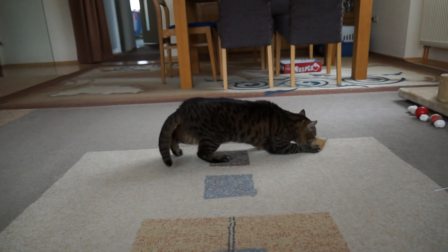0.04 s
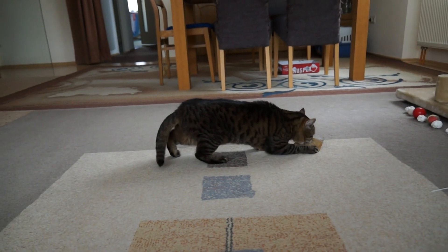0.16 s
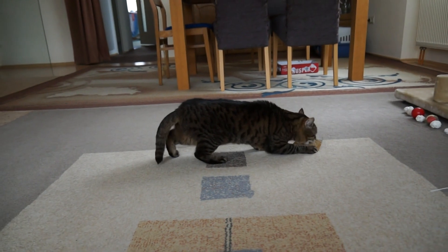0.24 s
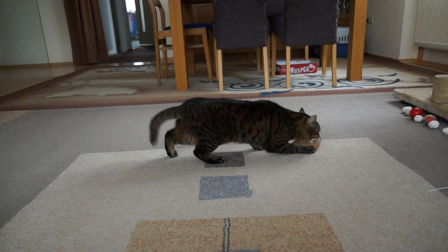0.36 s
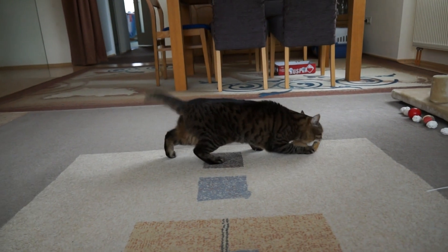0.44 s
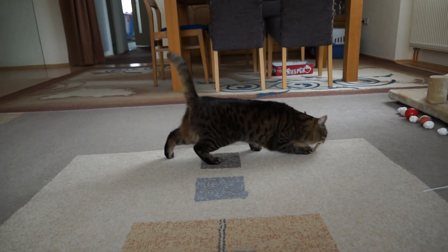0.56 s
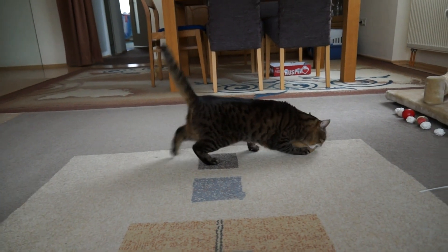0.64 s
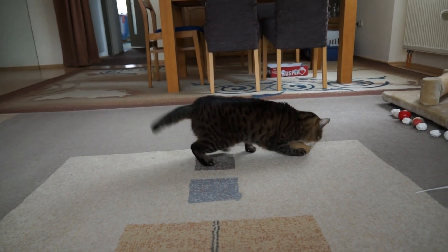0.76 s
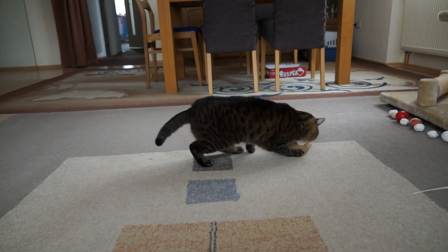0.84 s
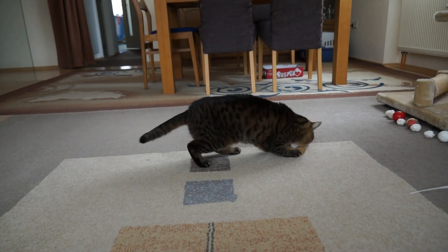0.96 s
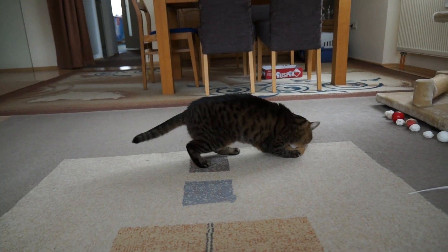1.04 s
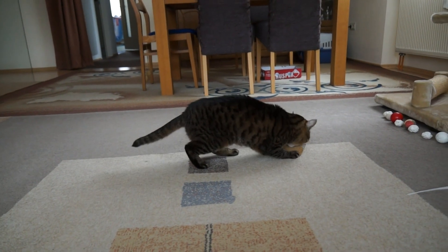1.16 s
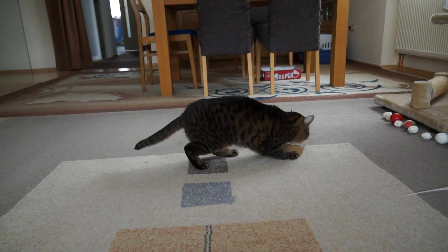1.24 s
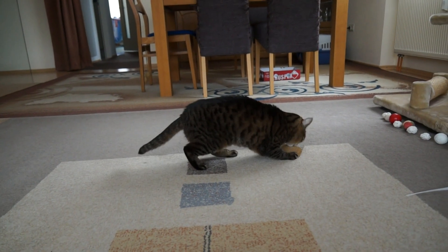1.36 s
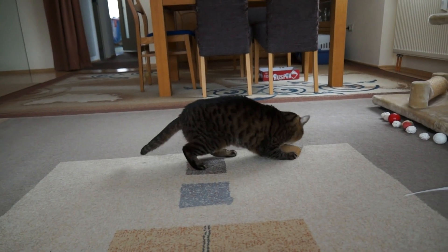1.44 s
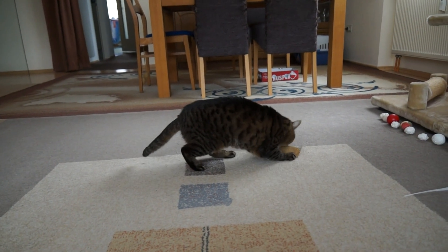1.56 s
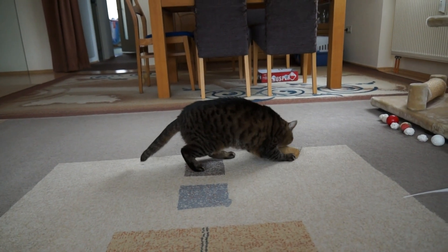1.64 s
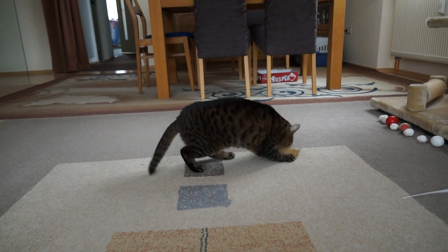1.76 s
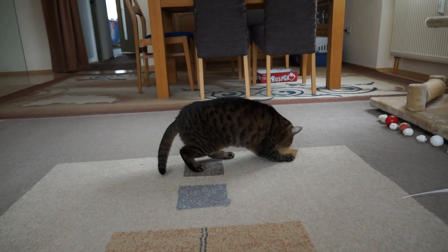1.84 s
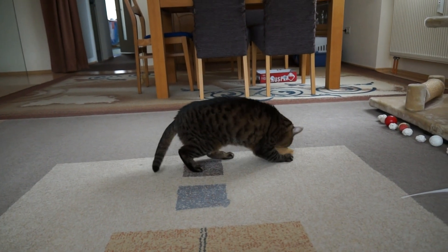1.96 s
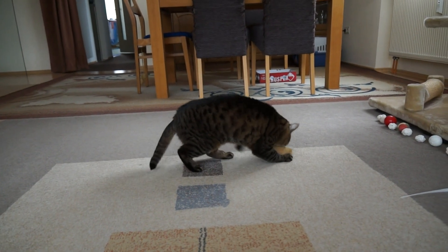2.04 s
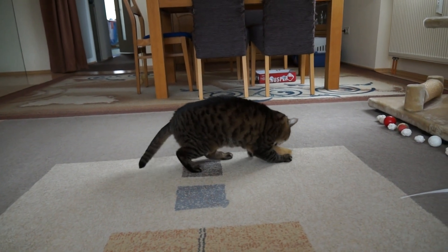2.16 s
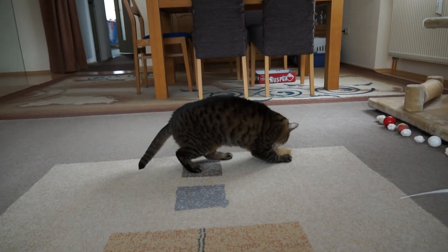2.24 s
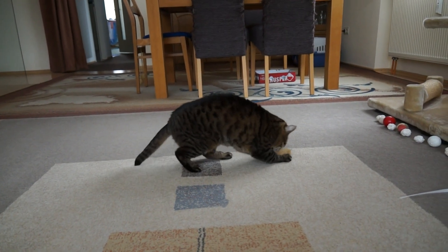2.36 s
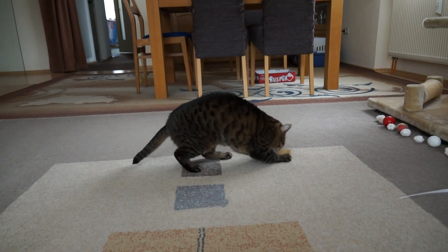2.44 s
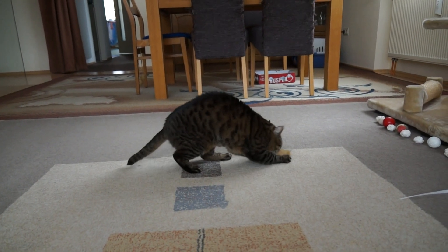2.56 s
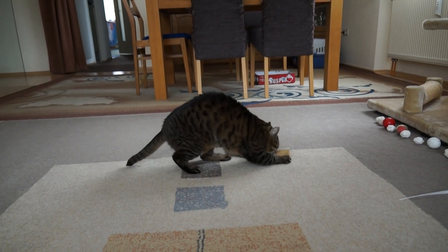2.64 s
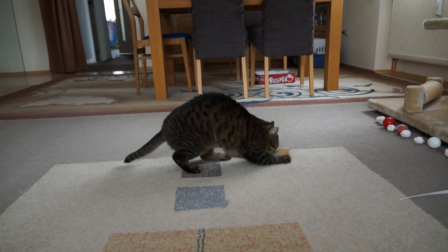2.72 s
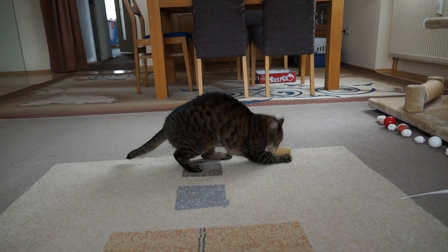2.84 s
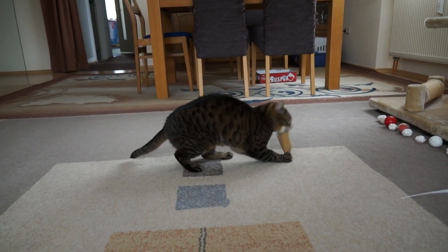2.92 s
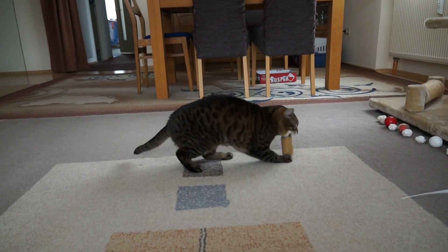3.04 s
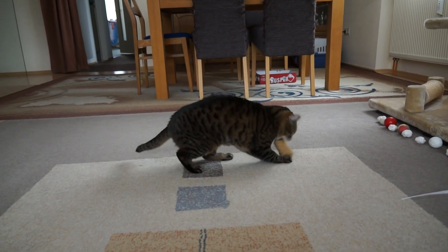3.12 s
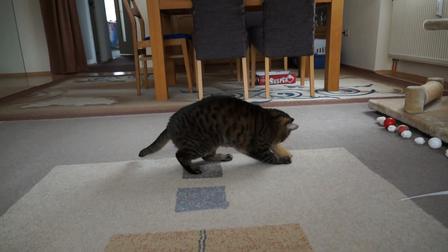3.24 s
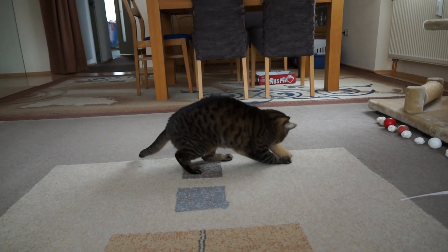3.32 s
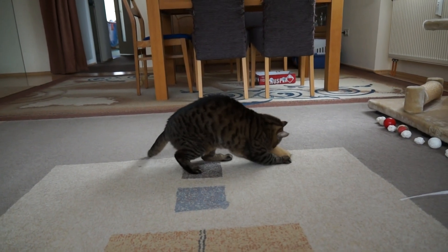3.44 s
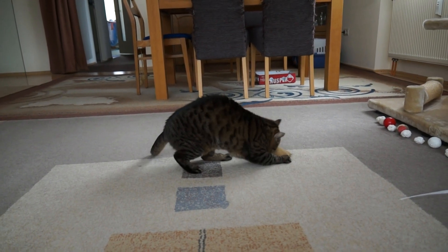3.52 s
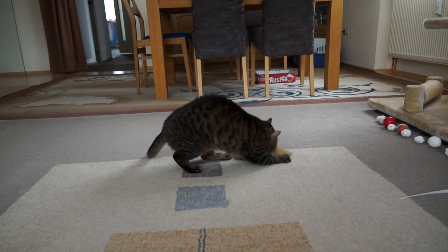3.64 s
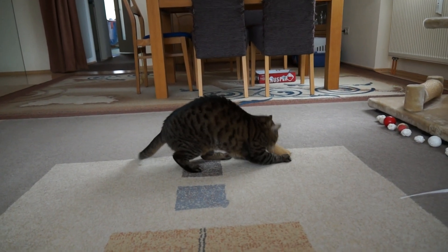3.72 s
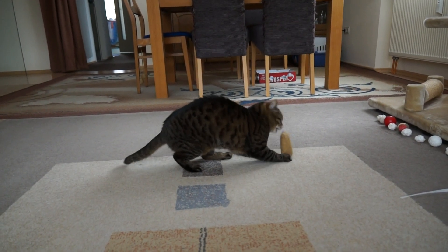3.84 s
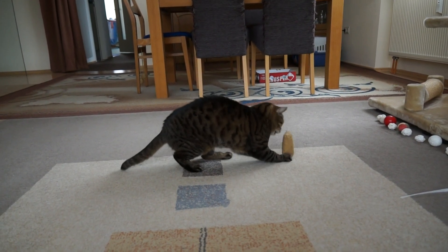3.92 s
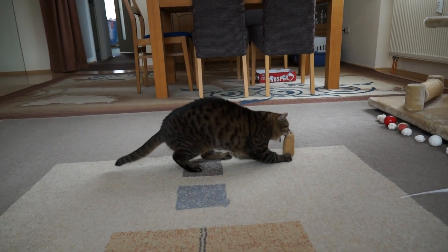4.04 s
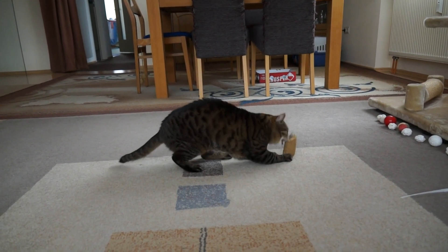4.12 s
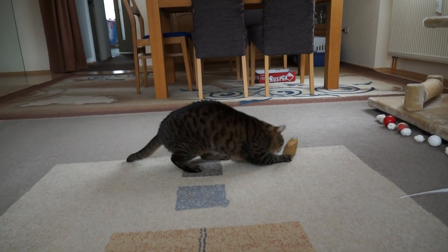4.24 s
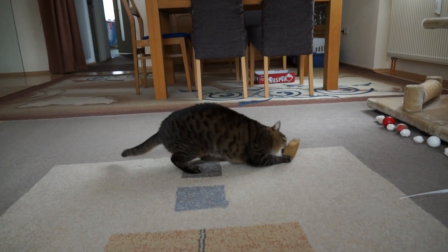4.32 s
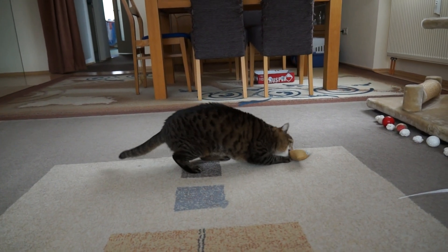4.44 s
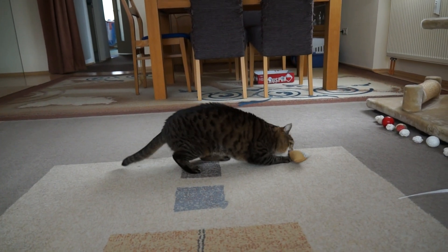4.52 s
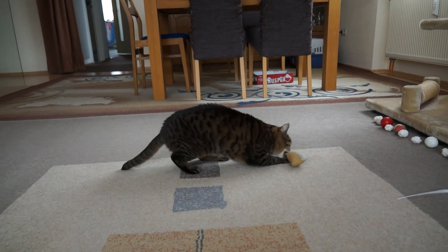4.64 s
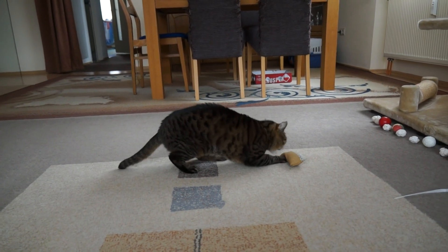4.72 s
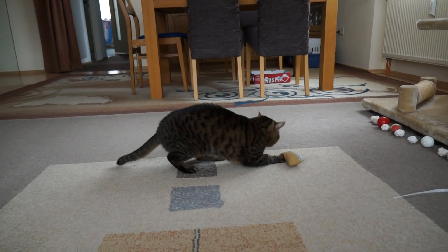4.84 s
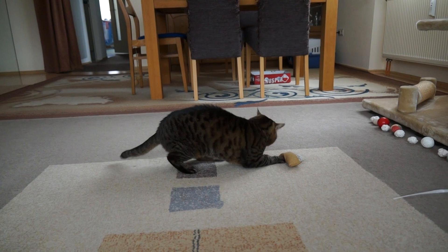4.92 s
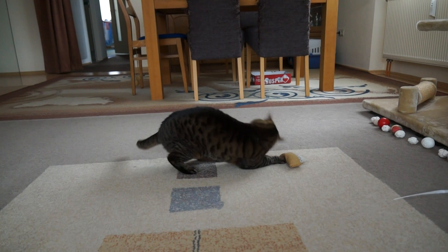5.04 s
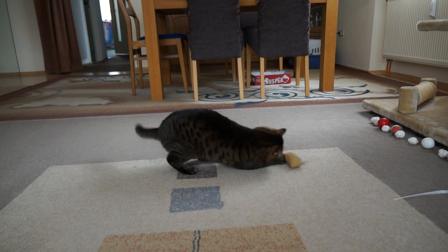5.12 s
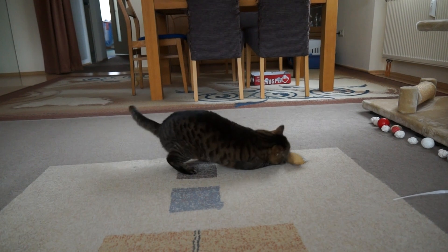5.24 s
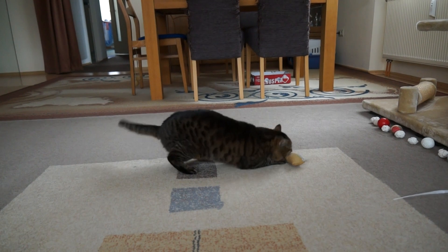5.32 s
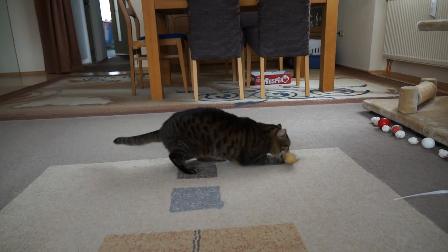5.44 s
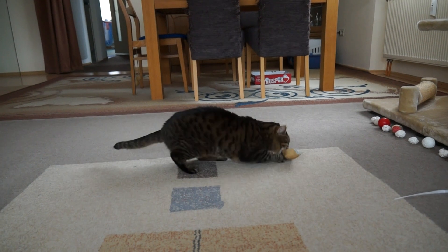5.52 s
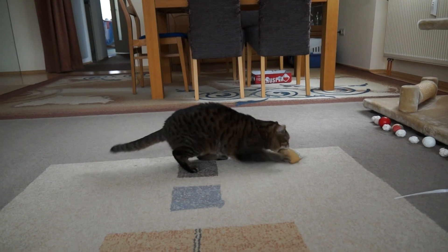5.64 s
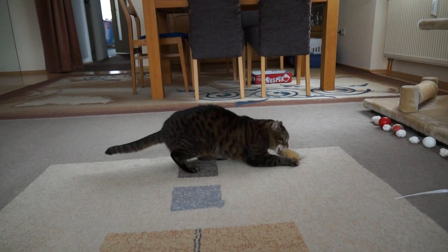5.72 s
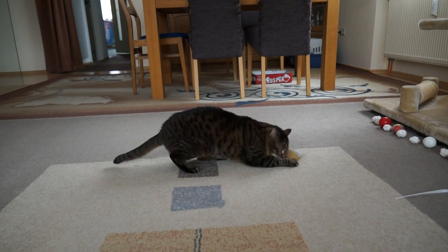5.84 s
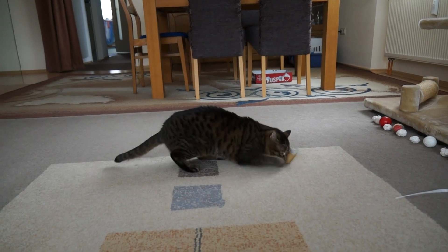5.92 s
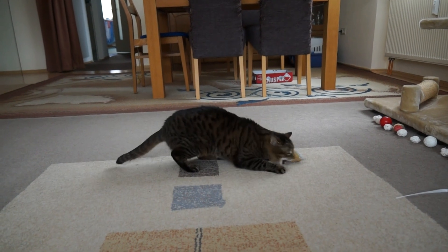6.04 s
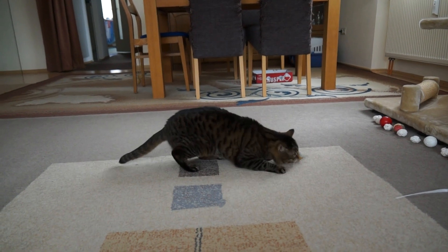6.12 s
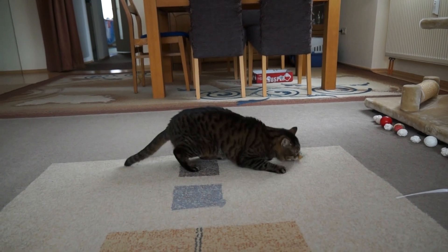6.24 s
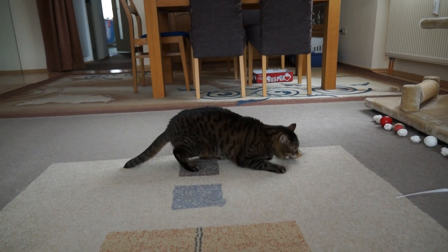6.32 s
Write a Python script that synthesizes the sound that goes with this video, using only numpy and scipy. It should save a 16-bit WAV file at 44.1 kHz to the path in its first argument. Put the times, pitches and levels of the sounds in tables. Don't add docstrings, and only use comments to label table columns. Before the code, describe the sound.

In a carpeted living room, a cat wrestles a small stuffed pillow about two metres from a small stereo microphone with little bass. From 0 s, fur and cloth brush in soft, fizzy strokes while paws drag on the pile. Around 0.6 to 1.3 s, rustling swells with clusters of very bright claw ticks and soft padding. At 1.7 s a snap and short scrape begin a tug; a crisp tick follows at 1.8 s and a harder clack with a cloth jerk at 2 s. Another tug cracks at 3 s, trailing tiny rattly smacks. From 3.2 to 5.4 s, gentler rustles swell and fade with sparse ticks and muted pats. At 5.6 s the strongest blow strikes the floor, sharp and knocking, followed by skidding, a padded tap near 5.95 s and light scuffling to 6.4 s. Dull echoes, faint unsteady motor hum and wide hiss persist.

```python
import sys
import numpy as np
from scipy import signal
from scipy.fft import rfft, irfft
from scipy.io import wavfile
from scipy.ndimage import uniform_filter1d

SR = 44100
rng = np.random.default_rng(int(sys.argv[2]) if len(sys.argv) > 2 else 0)


def volts_from_decibels(level):
    exponent = np.asarray(level, float) / 20
    return 10 ** exponent


def bounce(signal):
    frames = np.transpose(np.atleast_2d(signal))
    limited = np.clip(frames, -1, 1)
    pcm = np.round(limited * 32767).astype(np.int16)
    wavfile.write(sys.argv[1], SR, pcm)


N = 281358

# peak in seconds, peak level in dB, fall in ms, coarse share in dB.
FLICKS = [(0, -54.5, 120, -6.5), (.446, -54, 250, -11.5), (.695, -53, 270, -8.5), (1.2, -48.5, 110, -10.5),
          (1.444, -63, 86, -22), (2.133, -50.5, 56, -9.5), (2.176, -53, 170, -13.5), (2.659, -49, 650, -8),
          (3.425, -55, 190, -11.5), (4.033, -45, 78, -17.5), (4.375, -47.5, 117, -17.5),
          (4.457, -44, 164, -12.5), (4.63, -52.5, 120, -10), (5.257, -52.5, 120, -12.5),
          (5.759, -46, 57, -6.5), (2.556, -52, 94, -14), (6.156, -58, 50, -20), (3.405, -58, 42, -15)]
SWEEPS = [(.133, -56.5, 240, -10), (.221, -50.5, 40, -12), (.626, -47, 98, -6.5), (.909, -47.5, 110, -12),
          (1.086, -47, 190, -15), (1.378, -55.5, 94, -30), (1.604, -50, 41, -8.5), (1.8, -45, 46, -7.5),
          (1.806, -48, 190, -8), (1.998, -34.5, 9.8, -6.5), (2.98, -27.5, 10.4, -9),
          (3.101, -44.5, 80, -23), (3.269, -55, 120, -25), (3.591, -45, 130, -14), (3.86, -44, 31, -16),
          (4.185, -45.5, 105, -16.5), (4.525, -46.5, 104, -13.5), (4.722, -56.5, 115, -7),
          (5.157, -62.5, 67, -3), (5.428, -43.5, 153, -12.5), (5.508, -47.5, 62, -6),
          (5.555, -47.5, 38, -7), (5.639, -43, 90, -5), (5.959, -40, 20, -16), (6.193, -46, 66, -10),
          (6.274, -51.5, 92, -10)]
PULLS = [(.56, -55.5, 14, -17), (1.023, -59, 17, -7), (1.548, -70, 23, 0), (2.009, -46.5, 186, -9),
         (2.369, -46.5, 15, -10), (2.445, -49, 90, -11), (2.986, -39, 79, -15.5), (3.858, -45, 104, -13),
         (5.96, -44.5, 26.7, -14), (6.051, -56, 69, -7.5), (6.362, -52, 25, -21)]
FLICK_RISE_RATIO, SWEEP_RISE_RATIO, PULL_RISE_RATIO = 0.22, 0.73, 2.58

# frequency in Hz, density in dB per Hz.
FIBRE_SPECTRUM = [(1800, -25), (3000, -23), (4000, -13), (6000, -4.5), (8500, -0.5), (10500, 1),
                  (12000, -2), (14900, -12), (16500, -20)]
SNAG_SPECTRUM = [(1200, -39), (2200, -7), (3200, -2), (4500, -3), (7000, -13)]
STUFFING_SPECTRUM = [(120, -17.5), (300, -4.5), (600, -2), (1200, -3.5), (2000, -8), (3200, -20)]
# frequency in Hz, gain in dB.
SPREAD_TILT = [(4000, -3), (8000, 1.5), (12000, 3.5)]

# time in seconds, level in dB.
WEIGHT = [(0, -62), (.25, -64.5), (.49, -63.5), (1.09, -60.5), (1.685, -64), (1.705, -53), (1.84, -60.5),
          (2.18, -64), (2.55, -57), (3.12, -72.5), (3.57, -60.5), (4.02, -69), (4.35, -61), (5.3, -70),
          (5.5, -62), (5.77, -65), (6.0, -62.5), (6.38, -65)]
# peak in seconds, peak level in dB, fall in ms.
DRAGS = [(0, -57.5, 160), (.55, -63.5, 240), (1.094, -62, 370), (1.6, -61, 135), (1.8, -51, 170),
         (1.97, -63, 230), (2.41, -62, 340), (2.9, -56, 280), (3.72, -59, 320), (4.47, -64, 435),
         (5.15, -65.5, 270), (5.45, -55, 250), (5.95, -60.5, 280), (6.25, -61.5, 180)]
SKIDS = [
    (1.703, -54, 90),
    (2.004, -52, 150),
    (2.985, -62, 160),
    (5.592, -47.5, 130),
]
DRAG_RISE_RATIO, SKID_RISE_RATIO = 0.78, 0.056
# frequency in Hz, density in dB per Hz.
PILE_SPECTRUM = [(60, -28), (150, -12.5), (300, 2), (500, -3.5), (800, -5.5), (1100, -11.5), (1800, -19)]
WEAVE_SPECTRUM = [(400, -18.5), (800, -1), (1100, -2), (1600, 0), (2300, -9.5), (4000, -21.5)]

# time in seconds, peak level in dB, centre in Hz.
TICKS = [(0.42, -32, 10400), (0.612, -19, 10650), (0.628, -20, 10200), (0.6933, -26, 9300),
         (0.893, -27, 8600), (1.0106, -28, 10330), (1.0234, -16, 10800), (1.3545, -37, 8450),
         (1.5828, -32, 7960), (1.6023, -32, 9620), (1.8035, -10, 10400), (1.929, -22, 9670),
         (1.996, -14, 7800), (2.5521, -31, 10400), (2.9146, -14, 9400), (3.4283, -27, 10100),
         (4.0251, -25, 9200), (4.363, -25, 10100), (4.3834, -28, 8900), (4.4478, -24, 9430),
         (4.5241, -17.5, 10220), (5.4936, -25, 7080), (5.5114, -26, 5030), (5.5548, -25, 10910),
         (5.7588, -29, 9500), (5.919, -34, 5160), (5.9562, -27, 10500), (6.1753, -35, 10650),
         (6.2536, -23, 9400), (6.2775, -21.5, 9900), (.5397, -34, 11100), (.5566, -32, 10700),
         (.5911, -29, 10600), (1.049, -30, 11500), (1.1533, -23, 9600), (1.2056, -26, 10100),
         (1.116, -21, 11000), (1.134, -23, 11500), (1.256, -34, 11500), (1.311, -34, 9000),
         (1.7764, -24, 10510), (2.1286, -31, 9620), (2.333, -30, 10700), (2.4274, -25, 8880),
         (2.7731, -29, 10100), (2.8015, -27, 10200), (3.0859, -27, 10500), (3.4037, -35, 11000),
         (3.707, -31, 10300), (3.8561, -24, 10400), (4.1465, -33, 10600), (4.1584, -32, 10600),
         (4.6199, -31, 10400), (5.246, -34, 10100), (5.512, -21, 8550), (6.1554, -31, 12800),
         (6.1918, -25, 11800)]
# time in seconds, peak level in dB, centre in Hz, length in cycles.
SNAPS = [(1.5384, -37, 5800, 1.6), (1.6935, -22.5, 7000, 0.75), (1.9, -31, 10500, 2.5),
         (5.5834, -5.5, 8300, 0.89), (5.5836, -21.5, 2540, 1.36), (1.9, -40, 3500, 0.66),
         (1.7044, -33, 3300, 0.92), (1.5812, -40, 1400, 1.2), (1.9958, -42, 3300, 1.9),
         (2.1275, -44, 3460, 3.1), (1.8035, -26.5, 6000, 2), (1.9, -42, 4200, 1.2),
         (2.9776, -17, 9380, 0.7), (2.9772, -26, 3800, 1.45), (2.9865, -25, 5500, 2.7),
         (5.2126, -42, 2550, 2), (5.6205, -31, 11000, 1.4), (5.9195, -37.5, 3100, 2),
         (5.5945, -24, 4700, 2.5), (4.919, -42, 9000, 1.5), (4.962, -47, 10000, 1.3)]

# time in seconds, peak level in dB, ring in Hz, echo in dB.
PAWS = [(.629, -45, 665, 5.5), (.655, -43, 895, 1.5), (.91, -46, 1140, 5.5), (1.045, -49, 700, 1),
        (1.095, -47, 700, -2), (1.21, -47.5, 1200, 2), (1.537, -56, 711, 6), (1.829, -36.5, 1320, -5),
        (2.268, -55, 1040, -2), (2.571, -46, 816, 3), (3.77, -42, 721, -0.5), (4.721, -45.5, 646, -2),
        (5.146, -46.5, 880, 2), (5.462, -35.5, 820, -9), (5.5846, -17, 1126, -11), (5.588, -32, 744, -3),
        (5.7581, -39, 900, -9), (5.901, -49, 855, -5), (5.952, -32.5, 900, -7)]
# time in seconds, peak level in dB, ring in Hz,
# ring T60 in ms, echo in dB.
SMACKS = [(0.7135, -43, 3670, 10, -9), (0.7425, -42.5, 3700, 10, -9), (1.581, -41, 854, 3.2, -9),
          (1.694, -25, 756, 6, -0.5), (1.6943, -35.5, 1800, 5.6, 0), (1.7098, -33, 520, 14, -9),
          (1.722, -35, 470, 22, -9), (1.7305, -35, 660, 16, -9), (1.8225, -43, 1400, 16, -6),
          (1.9854, -31, 1200, 5, -10), (1.9969, -13, 980, 3.8, -8), (1.9971, -28.5, 1460, 4.9, 2.5),
          (2.6545, -32.5, 1520, 9, -5), (2.6645, -35, 900, 4.3, -6), (2.9737, -25, 720, 7.4, -14),
          (2.986, -31, 540, 12, -14), (2.978, -20, 2400, 20, -9), (2.993, -32, 2420, 16, -8),
          (2.9787, -30, 2700, 8, -13), (3.002, -34, 2180, 20, -5), (3.0187, -32, 2490, 40, -12),
          (3.027, -34, 2400, 22, -10), (3.056, -39.5, 2280, 20, -5), (4.727, -48, 5700, 31, -1),
          (5.2134, -33.5, 2090, 6.4, -14), (5.2443, -35, 1600, 3.4, -6), (5.563, -30.5, 2600, 3, -12),
          (5.585, -25.5, 1610, 5, 7), (5.5862, -32, 366, 16, -12), (5.5965, -26, 370, 18, -16),
          (5.6115, -29, 471, 14, -16), (5.6286, -32, 373, 16, -10), (5.5923, -30, 1150, 7, -12),
          (1.538, -42, 1500, 4.3, -8), (1.582, -45, 1800, 5, -8), (1.6952, -32, 1100, 6, -8),
          (5.9215, -40, 950, 8.8, -4), (2.678, -41, 1520, 22, -3), (5.92, -35.5, 1700, 7, -2),
          (6.181, -44.5, 1800, 6.6, 4.5)]
# time in seconds, peak level in dB, ring in Hz, ring T60 in ms.
THUDS = [(.66, -42, 380, 35), (.674, -47, 450, 20), (.698, -49, 750, 14), (.74, -48, 400, 20),
         (.892, -48, 400, 20), (.91, -44, 430, 16), (.935, -47, 480, 16), (1.036, -47, 400, 25),
         (1.052, -48, 400, 20), (1.09, -45, 340, 30), (1.206, -45.5, 420, 35), (2.113, -42, 577, 22),
         (2.41, -48, 520, 25), (2.462, -44, 700, 16), (2.603, -45.5, 380, 25), (3.58, -48, 600, 16),
         (3.61, -49, 500, 16), (3.763, -45.5, 300, 30), (3.847, -47, 380, 23), (3.852, -48, 1200, 14),
         (4.47, -49, 500, 16), (4.5, -49, 700, 16), (4.653, -48, 860, 20), (4.72, -48, 410, 30),
         (5.488, -43, 520, 16), (5.563, -39, 477, 18)]
PAW_T60_MS, THUD_ECHO_DB = 10.8, -8
PAW_THUMP_DB, SMACK_THUMP_DB = -7.5, -17.5

# frequency in Hz, left minus right in dB.
LEAN = [(200, -4), (1000, -8), (3000, -4.5), (6000, -1), (14000, 1)]
# delay in seconds, level in dB, left minus right in dB.
ECHOES = [(.0094, -11, -15.5), (0.0118, -9, 2), (0.017, -20, 5), (0.0221, -13, -6)]
# centre in Hz, T60 in seconds, level in dB.
ROOM = [(123, 0.5, -7), (250, 0.28, -7), (478, 0.41, -5.5), (962, 0.31, -3), (1940, 0.28, -2.5),
        (4160, 0.46, -14), (8600, 0.31, -18), (13600, 0.066, -21)]

# frequency in Hz, density in dB per Hz.
AIR_SPECTRUM = [(20, -8), (50, -3), (96, -14.5), (250, -9), (400, -12), (900, -7), (1270, -13),
                (3000, -15.5), (6000, -15), (11000, -17.5), (13000, -22), (16500, -24)]
# frequency in Hz, side over mid in dB.
AIR_SIDE = [(60, -6), (110, 10.5), (200, 7.5), (380, 13), (700, 7), (1290, 3.5), (2380, 4.5), (4400, -1.5),
            (8120, -8), (15000, 8.5)]
# time in seconds, frequency in Hz, level in dB.
MOTOR = [(0, 412, -90), (.3, 413, -74), (.5, 412, -77.5), (.9, 412.7, -79), (1.3, 415, -74.5),
         (1.6, 415, -76), (2.4, 415.5, -80), (3.2, 411.5, -78), (3.8, 417.4, -76), (4.3, 412.3, -80),
         (4.7, 412.5, -77.5), (5, 413.6, -73), (5.4, 414, -74), (5.9, 414, -84), (6.38, 409, -93)]
# multiple of the fundamental, level in dB.
HUM = [(1, -25), (2, 3.5), (3, -2.5), (4, 0.5)]


def curve(points, size):
    hz, db = np.transpose(points)
    return np.interp(np.log(np.fft.rfftfreq(size, 1 / SR) + 1), np.log(hz), db)


def equalise(x, points):
    return irfft(rfft(x) * volts_from_decibels(curve(points, len(x))), len(x))


def colour(x, spectrum):
    y = equalise(x, spectrum)
    return y / np.sqrt(np.mean(y ** 2))


def columns(table):
    s, *rest = np.transpose(table)
    return [np.interp(np.arange(N) / SR, s, column) for column in rest]


def walk(rate_hz):
    hold = int(SR / rate_hz)
    steps = np.repeat(rng.standard_normal(N // hold + 1), hold)
    return 1.55 * uniform_filter1d(uniform_filter1d(steps, hold), hold)[:N]


def slips(share, spread_db):
    excess = np.minimum(rng.exponential(size=N), 4)
    return (rng.random(N) < share) * rng.standard_normal(N) * volts_from_decibels(spread_db * excess)


def swells(rows, rise_ratio):
    t, power = np.arange(0, N + 32, 32) / SR, 0
    for s, db, fall_ms, *share_db in rows:
        before = t < s
        away = 1000 * np.abs(t - s) / (fall_ms * np.where(before, rise_ratio, 1))
        drop_db = 20 * np.minimum(away, 5) ** np.where(before, 1.5, 1.25)
        layers_db = np.array([0] + share_db)[:, None]
        power = power + volts_from_decibels(db - drop_db + layers_db) ** 2
    return np.repeat(power, 32, axis=1)[:, :N]


def add(out, s, sound):
    i = int(s * SR)
    out[i:i + len(sound)] += sound[:len(out) - i]


def rustle():
    power = swells(FLICKS, FLICK_RISE_RATIO) + swells(SWEEPS, SWEEP_RISE_RATIO) + swells(PULLS, PULL_RISE_RATIO)
    fine_gain, coarse_gain = np.sqrt(power)
    flurry_db = 0.9 * walk(45)

    def fizz():
        return colour(slips(share=0.25, spread_db=0.9), FIBRE_SPECTRUM) * volts_from_decibels(flurry_db + 0.91 * walk(250))

    fine, side = fizz(), fizz()
    pops = slips(share=0.0012, spread_db=1.5)
    crackle = signal.lfilter([1], [1, -np.exp(-1000 / (5 * SR))], pops ** 2)
    after = np.sqrt(0.75 + 0.6 * crackle)
    fine = fine * after + colour(pops, FIBRE_SPECTRUM) * volts_from_decibels(-14.5)
    side = equalise(side * after, SPREAD_TILT) * volts_from_decibels(-9)
    snag = colour(slips(share=0.15, spread_db=1.3), SNAG_SPECTRUM) * volts_from_decibels(0.5 * flurry_db - 3)
    stuffing = colour(slips(share=0.05, spread_db=1.5), STUFFING_SPECTRUM) * volts_from_decibels(flurry_db - 3)
    return fine_gain * fine + coarse_gain * (snag + stuffing), fine_gain * side


def scuff():
    weight_db = columns(WEIGHT)[0]
    soft = colour(slips(share=0.02, spread_db=2.0), PILE_SPECTRUM) * volts_from_decibels(weight_db - 7 + 1.8 * walk(25))
    scrape = colour(slips(share=0.05, spread_db=1.8), WEAVE_SPECTRUM)
    gain = np.sqrt(swells(DRAGS, DRAG_RISE_RATIO) + swells(SKIDS, SKID_RISE_RATIO))[0]
    return soft + scrape * gain * volts_from_decibels(-5 + 2.06 * walk(40))


def ticks():
    out, t = np.zeros(N), np.arange(-32, 96) / SR
    plain = [(s, db - 2.5, hz, 1.7) for s, db, hz in TICKS]
    for s, db, hz, cycles in plain + list(SNAPS):
        envelope = np.exp(-(t * hz / cycles * np.where(t < 0, 2, 1)) ** 2)
        add(out, s + 0.0006, volts_from_decibels(db - 4.5) * np.cos(2 * np.pi * hz * t) * envelope)
    return out


def knocks():
    out, t = np.zeros((2, N)), np.arange(4096) / SR
    thump = np.sin(2 * np.pi * 360 * t) * np.exp(-t / 0.0023)
    thump = signal.lfilter(*signal.butter(2, 170, "high", fs=SR), thump)
    blows = [(s, db, hz, PAW_T60_MS, echo_db, PAW_THUMP_DB) for s, db, hz, echo_db in PAWS]
    blows += [(*smack, SMACK_THUMP_DB) for smack in SMACKS]
    blows += [(*thud, THUD_ECHO_DB, SMACK_THUMP_DB) for thud in THUDS]
    for s, db, hz, t60_ms, echo_db, thump_db in blows:
        sagging_t = t + 0.00013 * (1 - np.exp(-t / 0.012))
        ring = np.sin(2 * np.pi * hz * sagging_t) * np.exp(-np.log(1000) * 1000 * t / t60_ms)
        ring = ring * (1 - np.exp(-t * hz / 0.22))
        ring = signal.lfilter(*signal.butter(1, hz / 3, "high", fs=SR), ring)
        blow = volts_from_decibels(db) * (volts_from_decibels(thump_db) * thump - ring)
        add(out[0], s, blow)
        add(out[1], s, blow * volts_from_decibels(echo_db))
    return out


def echoes(x):
    early = np.zeros((2, 2048))
    for s, db, pan_db in ECHOES:
        early[:, int(s * SR)] = volts_from_decibels(db + np.array([pan_db, -pan_db]) / 2)
    early = signal.lfilter(*signal.butter(4, 6500, fs=SR), early)
    return signal.fftconvolve(x[None], early, axes=1)[:, :N]


def room(x, size=16384):
    t, out, hop = np.arange(size) / SR, np.zeros((2, N + 4 * size)), size // 2
    shapes = []
    for hz, t60_s, db in ROOM:
        skirt = [(hz / 2, -40), (hz / 1.41, -3), (hz, 0), (hz * 1.41, -3), (hz * 2, -40)]
        onset = np.clip((t - 0.002) / 0.0048, 0, 1)
        decay = volts_from_decibels(db - 24.5) * np.exp(-np.log(1000) * t / t60_s) * onset
        shapes.append((volts_from_decibels(curve(skirt, size)), decay))
    density = (t / 0.15) ** 2 + 0.05
    x, fade = np.pad(x, (hop, size)), np.sin(np.pi * np.arange(size) / size)
    for i in range(0, N + hop, hop):
        hits = rng.standard_normal((2, size)) * (rng.random(size) < density)
        noise = rfft(hits / np.sqrt(np.minimum(density, 1)))
        mid, side = sum(irfft(noise * band, size) * decay for band, decay in shapes)
        side = side * volts_from_decibels(-6)
        piece = (x[i:i + size] * fade)[None]
        out[:, i:i + 2 * size - 1] += signal.fftconvolve(piece, [mid + side, mid - side], axes=1)
    return out[:, hop:hop + N]


def air():
    mid, side = (colour(rng.standard_normal(N), AIR_SPECTRUM) for _ in range(2))
    side = equalise(side, AIR_SIDE)
    hz, motor_db = columns(MOTOR)
    phase = np.pi * np.cumsum(hz) / SR
    hum = np.zeros(N)
    for multiple, db in HUM:
        level = np.sqrt(2) * volts_from_decibels(db + motor_db + 1.5 * walk(8.3))
        hum += level * np.sin(multiple * phase + 0.55 * walk(9.3))
    return volts_from_decibels(-62) * np.array([mid + side, mid - side]) + hum * np.array([[0.7], [1.3]])


def scene():
    direct, sent = knocks()
    cloth, side = rustle()
    pile, sharp = scuff(), ticks()
    lean_db = curve(LEAN, N) / 2
    near = irfft(rfft(cloth + pile + sharp + direct) * volts_from_decibels([lean_db, -lean_db]), N) + [side, -side]
    return near + echoes(sharp + sent) + room(cloth + pile + sharp + sent) + air()


def band_limit(x):
    return signal.sosfilt(signal.butter(12, 16500, fs=SR, output="sos"), x)


def record(dry):
    thin = signal.sosfilt(signal.butter(2, 150, "high", fs=SR, output="sos"), dry)
    mix = signal.sosfilt(signal.ellip(10, 0.2, 40, 15800, fs=SR, output="sos"), thin)
    return band_limit(mix)


dry = scene()
out = record(dry)
bounce(out)
```